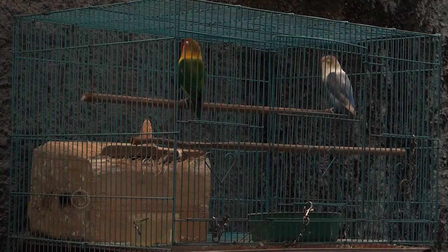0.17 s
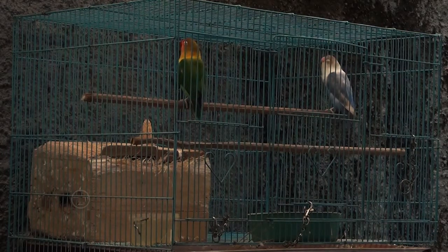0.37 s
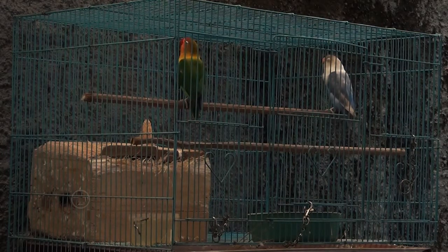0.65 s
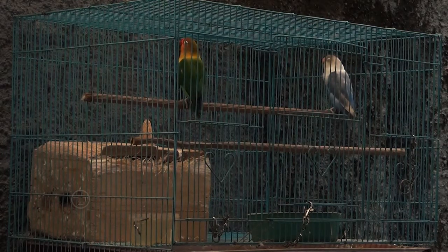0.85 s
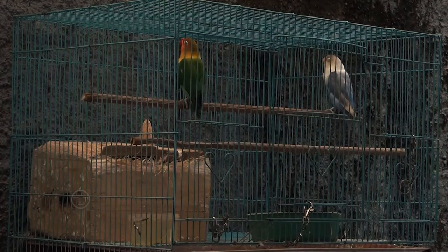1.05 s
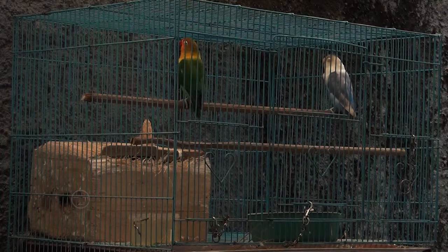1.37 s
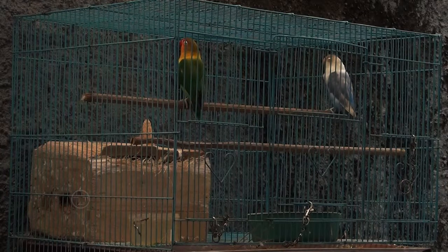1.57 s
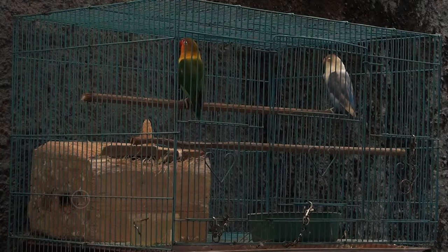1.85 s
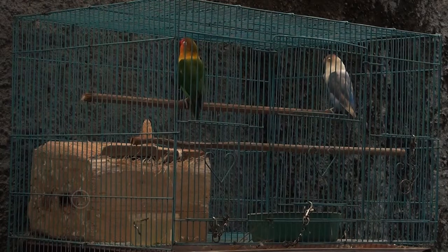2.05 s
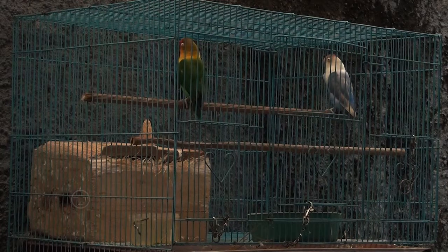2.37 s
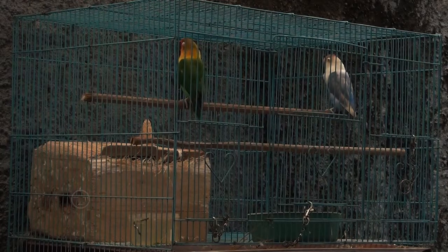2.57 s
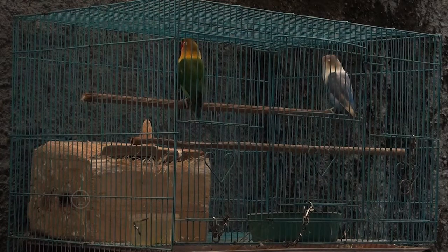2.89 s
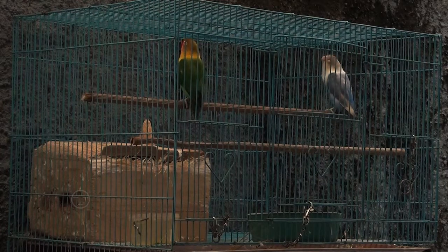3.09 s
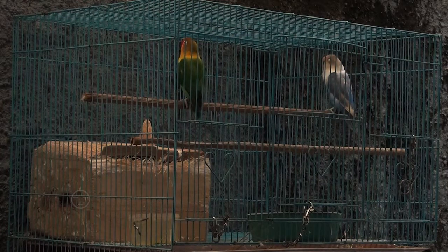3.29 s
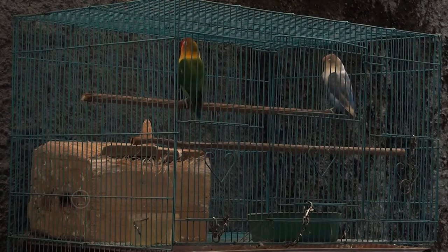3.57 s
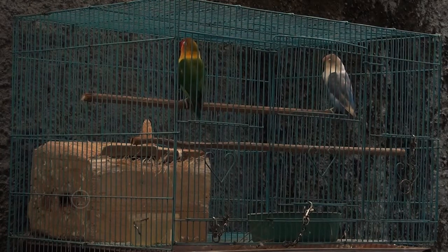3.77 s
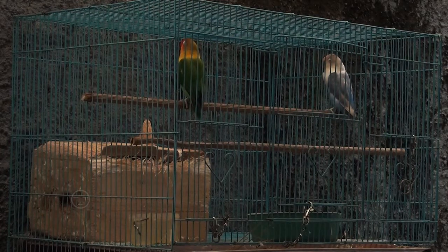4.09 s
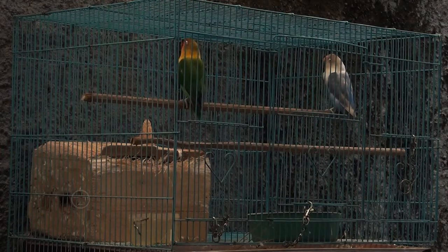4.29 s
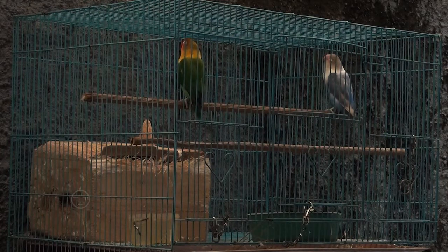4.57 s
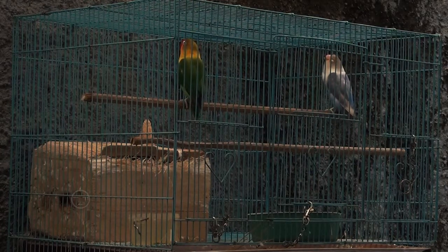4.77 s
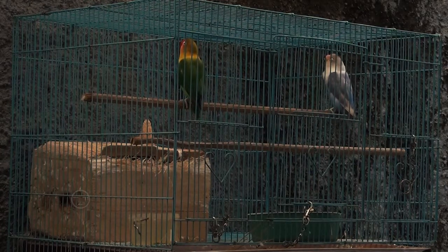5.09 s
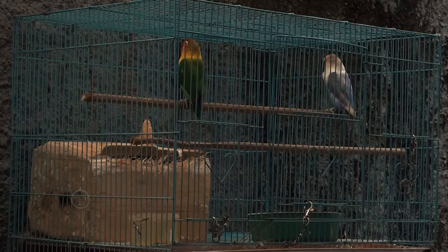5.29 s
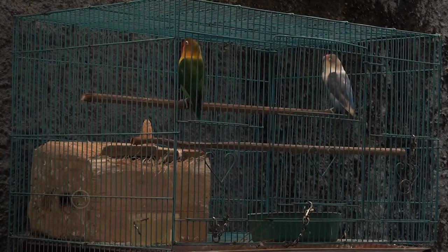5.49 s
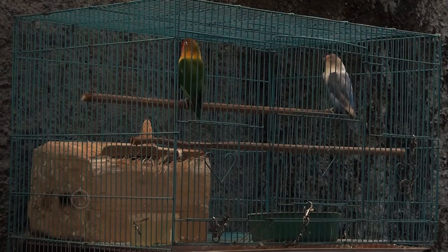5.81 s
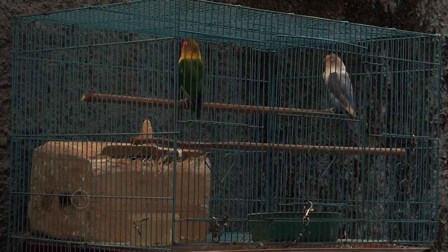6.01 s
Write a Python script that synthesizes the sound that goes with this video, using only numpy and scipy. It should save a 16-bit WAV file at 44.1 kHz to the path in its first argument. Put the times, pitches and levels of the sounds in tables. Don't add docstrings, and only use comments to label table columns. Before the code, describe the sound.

A small caged parrot fires off shrill, quick, gliding chirps in echoing bursts while traffic hisses and an engine drones faintly outside.

```python
import sys
import numpy as np
from scipy import signal
from scipy.fft import rfft, irfft
from scipy.io import wavfile
from scipy.ndimage import uniform_filter1d

SR = 44100
rng = np.random.default_rng(int(sys.argv[2]) if len(sys.argv) > 2 else 0)


def pcm_store(signal):
    levels = np.round(np.clip(np.atleast_2d(signal), -1, 1) * 32767)
    wavfile.write(sys.argv[1], SR, levels.astype(np.int16).T)


def decibels_to_gain(level_db):
    exponent = np.asarray(level_db, float) / 20
    return 10 ** exponent


N = 270774
LEAD = 11025


def rms_one(x):
    return x / np.sqrt(np.mean(x ** 2) + 1e-20)


def in_time(rows):
    s, value = np.transpose(rows)
    return np.interp(np.arange(N) / SR, s, value)


def at_hz(points, hz):
    points_hz, level_db = np.transpose(points)
    return np.interp(np.log(np.maximum(hz, 1)), np.log(points_hz), level_db)


def drift(rate, size, at=slice(None)):
    steps = rng.standard_normal(int(size / SR * 2000) + 3)
    return np.interp(np.arange(size)[at] * min(rate, 2000) / SR, np.arange(len(steps)), steps)


def band_pass(order, low_hz, high_hz, x):
    return signal.sosfilt(signal.butter(order, [low_hz, high_hz], "band", fs=SR, output="sos"), x)


def add(track, s, sound):
    at = round(s * SR) + LEAD
    track[at:at + len(sound)] += sound[:len(track) - at]


# [f/Hz, side minus mid level/dB]
WIDTH = [(60, -46), (150, -47), (380, -19.5), (950, -12), (2380, -9), (5980, -12.5), (15000, -22)]


def coloured(spectrum):
    hz = np.arange(N // 2 + 1) * SR / N
    mid, side = rfft(rng.standard_normal((2, N)))
    gain = decibels_to_gain(at_hz(spectrum, hz)) * (hz > spectrum[0][0]) * (hz < spectrum[-1][0])
    side = side * decibels_to_gain(at_hz(WIDTH, hz))
    return rms_one(irfft(gain * np.array([mid + side, mid - side]), N))


# [t/s, level/dB]
TRAFFIC = [(0, -50.5), (.75, -48.5), (1.52, -43.5), (2.05, -49.5), (2.77, -47), (3.2, -52.5), (3.6, -49),
           (4.55, -45.5), (4.86, -52.5), (5.3, -47), (6.14, -43)]
# [f/Hz, level/dB per Hz]
STREET = [(18, -35), (30, -56), (58, 2.5), (91, -24.5), (140, -4), (215, -2.5), (266, -9), (391, -4),
          (445, -9.5), (563, -8), (627, -8.5), (1750, -13.5), (5000, -28.5), (6500, -72), (11000, -120)]


def street():
    level_db = in_time(TRAFFIC) + 6 + 0.5 * drift(10.0, N)
    return decibels_to_gain(level_db) * coloured(STREET)


# [t/s, turning rate f/Hz]
SPEED = [(0, 30.8), (1.5, 28.7), (3, 30.8), (4.2, 30.2), (6.14, 31.4)]
# [t/s, level/dB]
DRONE = [(0, -49), (.5, -49), (1.2, -47), (2.7, -45.5), (3.1, -53), (3.6, -49.5), (4.55, -51.5),
         (4.8, -54.5), (6.14, -54)]
# [multiple of the turning rate, level/dB]
ORDERS_DB = [(1, -20), (2, -20), (3, -14), (4, -14), (5, -2.5), (6, -2.5), (7, -4.5), (8, -4.5), (9, -27),
             (10, -2), (11, -4.5), (12, -4.5), (13, 1), (14, -5), (15, -11), (16, -31), (17, -7.5),
             (18, -10), (19, -6.5), (20, -13)]
# [t/s, half width/s, multiple, level/dB]
SWELLS = [
    (2.43, 0.34, 5, 6),
    (3.9, 0.55, 5, 6),
    (2.2, .25, 6, 4),
    (3.65, 0.34, 6, 9.5),
    (5.87, 0.78, 6, 16),
    (1.96, 0.24, 7, 11.5),
    (2.883, 0.12, 7, 17.5),
    (4.5, 0.15, 7, 15.5),
]
# [t/s, length/s, f/Hz, level/dB]
WHINES = [
    (1.302, 0.32, 826, -42),
    (1.445, 0.21, 577, -43),
    (5.708, 0.19, 1095, -43.5),
]


def engine():
    turns = np.cumsum(in_time(SPEED) * (1 + 0.00281 * drift(3.48, N))) / SR
    t, out, drone_db = np.arange(N) / SR, 0, in_time(DRONE)
    for multiple, line_db in ORDERS_DB:
        level_db = drone_db + line_db + 3.6 * drift(9, N)
        for s, half_width, boom_multiple, boom_db in SWELLS:
            if boom_multiple == multiple:
                level_db = level_db + boom_db * np.exp(-((t - s) / half_width) ** 2)
        out = out + decibels_to_gain(level_db) * np.sin(2 * np.pi * (multiple * turns + rng.random()))
    for s, length, hz, level_db in WHINES:
        swell = np.sin(np.pi * np.clip((t - s) / length, 0, 1))
        out = out + decibels_to_gain(level_db) * swell * np.sin(2 * np.pi * hz * t)
    return out


# [f/Hz, decay time/s]
WALLS = [(1500, 0.61), (3000, 0.58), (6000, 0.55), (10000, 0.45), (15000, 0.52)]
# [delay t/s, level change/dB]
TAIL_DIPS = [
    (0.013, -2.5),
    (0.023, -7),
    (0.049, -1.5),
    (0.067, -4),
    (.093, -1.5),
    (.12, 0),
]
# [delay t/s, sign, level/dB]
NEAR = [
    (.00161, -1, -31.5),
    (.00313, 1, -14.5),
    (.00415, 1, -26),
    (.00862, -1, -25),
    (0.015, -1, -15),
    (0.0238, -1, -16),
]
# [f/Hz, side minus mid level/dB]
SPREAD = [(1500, -12.5), (4000, -9.5), (8000, -13), (13000, -15)]


def walls(x, wet_db, side_db, gap_s):
    t, tail = np.arange(SR) / SR, 0
    echoes = rng.standard_normal((2, SR)) * (rng.random((2, SR)) < .03 + t / .06)
    echoes = echoes / np.sqrt(np.minimum(0.0068 + t / 0.056, 1)) * np.clip(t / gap_s - 1, 0, 1)
    dip_db = sum(db * np.exp(-((t - s) / 0.0065) ** 2) for s, db in TAIL_DIPS)
    early_db = 1.5 / (1 + (t / 0.099) ** 8)
    echoes = echoes * decibels_to_gain(dip_db + early_db)
    edges = np.geomspace(900, 18000, 10)
    for low, high in zip(edges, edges[1:]):
        decay_s = at_hz(WALLS, np.sqrt(low * high))
        tail = tail + band_pass(2, low, high, echoes) * decibels_to_gain(-60 * t / decay_s)
    mid, side = decibels_to_gain(wet_db - 28.0) * tail
    for s, sign, level_db in NEAR:
        mid[round(s * SR)] += sign * decibels_to_gain(level_db)
    side = irfft(rfft(side) * decibels_to_gain(side_db + at_hz(SPREAD, np.arange(SR // 2 + 1))))
    wet = signal.fftconvolve(x[None], np.array([mid + side, mid - side]), axes=1)
    return (x + wet[:, :len(x)])[:, LEAD:]


# [t/s, peak level/dB]
TICKS = [
    (1.869, -46),
    (2.51, -38),
    (3.716, -38),
    (3.87, -50),
    (4.208, -45),
]
# [t/s, length/s, level/dB]
RUSTLES = [(.692, 0.0094, -23), (2.099, .028, -20), (2.947, .004, -29), (2.954, 0.011, -18),
           (4.642, 0.0095, -21), (4.652, 0.0092, -25), (.254, .006, -28), (2.72, 0.016, -23),
           (3.2, .0041, -34), (4.226, 0.011, -27.5), (3.001, .004, -26), (4.688, .003, -23),
           (3.217, 0.0044, -21), (4.7, .0033, -26), (5.428, 0.0028, -27), (6.8, .0025, -23),
           (5.444, .003, -16), (6.6, .012, -30), (4.86, 0.038, -23), (3.16, 0.039, -22), (0.28, .07, -25)]
# [t/s, length/s, level/dB]
SHAKES = [
    (4.376, .018, -34),
    (4.448, 0.031, -33),
]
# [t/s, length/s, level/dB]
RASPS = [
    (4.2255, .01, -14),
    (4.241, .008, -19),
    (5.436, .016, -33),
]


def cage():
    track, t = np.zeros(N + LEAD), np.arange(400) / SR
    for s, peak_db in TICKS:
        crack = band_pass(2, 6500, 14000, rng.standard_normal(len(t))) * np.exp(-t / 0.0013)
        add(track, s, decibels_to_gain(peak_db) * crack)
    for puffs, low_hz, high_hz in ((RUSTLES, 1900, 12800), (SHAKES, 1900, 16000), (RASPS, 2300, 3700)):
        for s, length, level_db in puffs:
            puff = band_pass(4, low_hz, high_hz, rng.standard_normal(3000))[:int(length * SR)]
            add(track, s, decibels_to_gain(level_db) * puff * np.hanning(len(puff)))
    return track


# [f/Hz, level/dB]
THROAT = [(1400, 3), (2500, 9), (4000, 7.5), (6000, 2), (8000, 0.5), (10000, -7), (12000, -6),
          (13300, -9.5), (14300, -16), (16000, -29)]


def voice(notes, jitter, flutter_db, fall_db, rasp_db, fray, tie_s=.001):
    s, length, start_hz, end_hz, level_db, second_db = np.transpose(sorted(notes))
    t = (np.arange(N + LEAD) - LEAD) / SR
    length, slur_s = np.maximum(length, .002), .0008 + tie_s

    def along(first, last, a, b):
        knots = np.maximum.accumulate(np.ravel([s + first * length, s + last * length], "F"))
        return uniform_filter1d(np.interp(t, knots, np.ravel([a, b], "F")), round(slur_s * SR))

    blowing = np.searchsorted(s, t) > np.searchsorted(np.sort(s + length + tie_s), t)
    gate = uniform_filter1d(uniform_filter1d(blowing * 1., 40), 40)
    on = gate > 1e-4
    hz = (along(0, 0.92, start_hz, end_hz) * (1 + jitter * drift(900, len(t))))[on]
    order = np.arange(1, 8)[:, None]
    overtone_db = along(0.033, 0.84, second_db, second_db)[on] - fall_db * (order - 2)
    stack_db = (order > 1) * overtone_db + at_hz(THROAT, order * hz)
    leap = np.abs(np.gradient(uniform_filter1d(np.log(hz), 60))) * SR
    stack_db = stack_db - 0.03 * order * np.minimum(leap, 150)
    frayed = np.clip(fray * (order - 1.7), 0, 1)
    torn = np.array([drift(1500, len(t), on) for _ in order])
    grain = np.sqrt(1 - frayed) + np.sqrt(frayed) * 0.79 * torn
    waves = np.sin(2 * np.pi * order * np.cumsum(hz) / SR)
    tones = grain * decibels_to_gain(stack_db) * (order * hz < .45 * SR) * waves
    air = band_pass(4, 2300, 12000, rng.standard_normal(len(t))[on])
    effort = decibels_to_gain(along(0.13, 0.72, level_db, level_db) + flutter_db * drift(350, len(t))) * gate
    track = np.zeros(len(t))
    track[on] = effort[on] * (tones.sum(axis=0) + decibels_to_gain(rasp_db) * air)
    return track


def overtone(notes, second_db):
    return [(*note, second_db) for note in notes]


# [t/s, length/s, f/Hz, level/dB]
HOLLOW = [
    (4.325, .014, 1500, -32.5),
]


def hollow_note(multiple, change_db):
    return [(s, n, multiple * hz, multiple * hz, db + change_db, -40) for s, n, hz, db in HOLLOW]


# [t/s, length/s, start f/Hz, end f/Hz, level/dB]
PURE = [
    (1.862, .03, 7550, 7400, -59),
    (2.719, 0.014, 2328, 2374, -31.5),
    (5.546, 0.0122, 3291, 3660, -33.5),
    (5.558, 0.0118, 3895, 4323, -21),
    (5.57, 0.012, 4270, 4206, -19),
    (5.582, 0.0116, 4210, 4117, -13),
    (5.594, 0.022, 3896, 3847, -14.5),
]


def second_bird():
    return voice(overtone(PURE, -1) + hollow_note(1, 0),
                 jitter=0.00074, flutter_db=0.0, fall_db=8, rasp_db=-46, fray=0.014, tie_s=0.0022)


# [t/s, length/s, start f/Hz, end f/Hz, level/dB]
CHIRP = [
    (5.936, 0.0047, 3560, 3565, -28),
    (5.956, 0.012, 2520, 3050, -30),
    (5.968, 0.034, 2956, 2887, -36.5),
    (5.992, 0.012, 2800, 2940, -26.5),
    (6.008, 0.022, 2830, 2470, -28),
    (6.03, 0.013, 2376, 2300, -22.5),
]


def last_chirp():
    return voice(overtone(CHIRP, -5.5), jitter=0.0029, flutter_db=1.5, fall_db=1.5, rasp_db=-31.5, fray=0.088)


# [t/s, length/s, start f/Hz, end f/Hz, level/dB]
HARSH = [(-.2, 0.041, 1898, 2483, -17.5), (-.15, 0.036, 2445, 3200, -25), (-.11, 0.034, 3210, 4210, -27.5),
         (.254, 0.0063, 3230, 4677, -20), (.3, 0.0099, 4825, 4500, -13.5), (.692, 0.008, 3170, 3070, -15),
         (.75, .02, 4930, 4573, -13), (2.104, 0.004, 2598, 3270, -10), (2.142, .01, 2810, 2988, -34),
         (2.154, 0.012, 3777, 4300, -23), (2.111, .009, 5680, 5160, -16), (2.121, .022, 4500, 4377, -19),
         (2.955, 0.007, 3111, 2409, -21), (3.252, 0.03, 4600, 4300, -17.5), (3.285, 0.051, 3727, 4090, -28),
         (3.392, 0.013, 1512, 2100, -28.5), (4.2255, .004, 3703, 2600, -23.5),
         (4.23, .004, 2694, 3685, -20), (4.928, .025, 4500, 4200, -17), (4.242, 0.004, 3327, 2490, -27),
         (4.635, 0.004, 3300, 2893, -17.5), (4.905, .006, 4378, 4487, -16), (4.914, .01, 4607, 4300, -15.5),
         (.262, .006, 4824, 4875, -23), (5.147, 0.007, 4010, 4374, -15), (5.163, 0.02, 2694, 2550, -31),
         (5.949, .006, 2547, 2450, -28.5)]
# [t/s, length/s, start f/Hz, end f/Hz, level/dB]
CROAKS = [(.202, 0.0068, 2748, 2418, -21.5), (.309, 0.012, 2300, 1496, -29),
          (.322, 0.051, 1618, 2300, -31.5), (2.948, 0.0019, 2590, 2503, -21),
          (3.0, 0.0072, 3003, 3371, -30), (3.149, 0.0083, 2597, 1800, -24.5),
          (3.16, 0.033, 1961, 2402, -24), (3.223, 0.02985, 2679, 2808, -32.5),
          (4.642, 0.0086, 2444, 2604, -20.5), (4.865, 0.025, 2736, 2570, -23.5),
          (5.138, 0.011, 2562, 2685, -23.5)]


def harsh_notes():
    first_s, gap_s, length_s, hz, level_db = 5.428, .008, .003, 1880, -28.5
    cluck = [(first_s + k * gap_s, length_s, 0.95 * hz, 1.2 * hz, level_db) for k in range(3)]
    return voice(overtone(HARSH, 0) + overtone(cluck, 0) + overtone(CROAKS, 9),
                 jitter=0.05, flutter_db=4, fall_db=4.5, rasp_db=-11.0, fray=.45)


# [t/s, length/s, f/Hz, level/dB]
TOP = [(0.261, .014, 4880, -12), (3.257, .024, 5660, -13.5), (0.414, .016, 5850, -16.5),
       (0.81, .013, 5990, -15.5), (2.72, 0.01188, 5970, -14.5), (2.732, .016, 6110, -11),
       (2.767, .014, 6140, -15.5), (3.015, .0084, 5690, -11.5), (3.086, .03, 6110, -13.5),
       (4.693, .011, 4843, -10.5), (4.702, .012, 6050, -9), (4.765, .0071, 4706, -11),
       (4.773, .02, 6157, -12), (4.828, .012, 6147, -16), (2.754, .008, 6100, -17),
       (3.128, .018, 6203, -15.5), (4.92, .0088, 5400, -15)]


def top_notes():
    rise_per_s = 1.47
    top = []
    for s, length, hz, level_db in TOP:
        half_rise = rise_per_s * length / 2
        top.append((s, length, hz * (1 - half_rise), hz * (1 + half_rise), level_db))
    return voice(overtone(top, -3) + hollow_note(3, -7),
                 jitter=0.0095, flutter_db=3.5, fall_db=6, rasp_db=-17, fray=0.21, tie_s=0)


# [t/s, length/s, start f/Hz, end f/Hz, level/dB]
LOW = [
    (.209, .011, 2362, 2206, -27),
    (.246, .011, 2416, 2556, -29.5),
    (2.963, 0.047, 2365, 2233, -26),
    (4.652, .008, 3007, 3021, -25),
    (4.672, 0.014, 2373, 2330, -26.5),
    (4.889, 0.014, 2320, 2272, -26),
]
# [t/s, length/s, start f/Hz, end f/Hz, level/dB]
SLIDES = [(2.1755, 0.0033, 3848, 3847, -19.5), (4.957, .012, 3883, 3825, -27),
          (4.971, 0.013, 3898, 3848, -19), (.221, 0.0093, 2560, 2630, -24),
          (.229, 0.014, 2827, 3010, -20.5), (.683, 0.0046, 2322, 2245, -25),
          (2.074, 0.011, 1637, 1696, -34.5), (3.213, .01, 2593, 2634, -20.5),
          (4.66, 0.01177, 2670, 2420, -25), (4.843, 0.0076, 1646, 1764, -31),
          (4.853, 0.008, 1884, 2877, -19), (5.088, .01, 1968, 2705, -29)]
# [t/s, length/s, start f/Hz, end f/Hz, level/dB]
FALLING = [(2.11, .006, 3203, 3024, -15), (3.417, 0.0071, 2465, 2166, -19),
           (3.439, 0.011, 5354, 5320, -18.5), (.272, .016, 5045, 3625, -15),
           (.288, 0.017, 3480, 3345, -19.5), (.386, 0.0067, 5250, 5080, -11.5),
           (.393, 0.01, 3747, 3640, -9), (.44, 0.0024, 3750, 3530, -12), (.768, .018, 5000, 4313, -19),
           (.788, 0.016, 3552, 3552, -12), (2.118, 0.018, 2243, 2170, -21),
           (3.028, 0.0098, 5765, 5097, -19), (3.041, 0.021, 3516, 3355, -11),
           (3.196, 0.0079, 3637, 3506, -9), (3.204, 0.0086, 3448, 3145, -11),
           (4.712, 0.014, 4775, 4480, -10.5), (4.727, 0.0086, 4060, 3308, -14.5),
           (4.859, 0.015, 3650, 3320, -14), (4.997, 0.013, 6230, 5730, -13),
           (5.126, .011, 3475, 3263, -10.5)]
# [t/s, length/s, start f/Hz, end f/Hz, level/dB]
RISING = [(.375, 0.012, 2380, 3270, -20), (.404, 0.006, 3660, 4260, -12.5),
          (.703, 0.0087, 3160, 3513, -15.5), (.713, 0.0065, 3506, 3864, -10.5),
          (.722, 0.009, 4130, 4270, -10.5), (.732, 0.012, 4474, 5150, -11.5),
          (.827, 0.013, 4225, 4376, -10.5), (.839, 0.015, 4360, 4430, -15),
          (2.084, 0.0063, 1842, 2057, -20.5), (2.091, .011, 2110, 2209, -17.5),
          (2.166, 0.0078, 2952, 3302, -15.5), (2.18, 0.0048, 2403, 3280, -9.5),
          (2.186, .013, 4190, 4240, -14.5), (2.202, 0.0052, 4090, 4400, -12.5),
          (3.061, .012, 3526, 3750, -15.5), (3.074, .003, 3810, 3885, -12), (3.079, 0.0026, 4050, 4200, -8),
          (3.225, 0.012, 3794, 3855, -14.5), (3.237, 0.018, 3823, 3969, -19.5),
          (3.426, 0.0049, 3107, 3686, -15.5), (3.432, .006, 4200, 5170, -21.5),
          (4.737, 0.032, 3854, 4252, -17), (4.991, 0.0038, 3896, 4310, -10.5),
          (5.076, 0.011, 1667, 1753, -26.5), (5.108, 0.008, 2683, 2744, -27),
          (5.121, 0.0049, 3120, 3500, -15)]


def clear_notes():
    notes = overtone(LOW, 16) + overtone(SLIDES, 7) + overtone(FALLING, -12.5) + overtone(RISING, -4)
    return voice(notes, jitter=0.0087, flutter_db=3.0, fall_db=2.0, rasp_db=-17.5, fray=0.13, tie_s=0)


def birds():
    return clear_notes() + top_notes() + harsh_notes() + last_chirp() + second_bird()


def scene():
    calls = birds()
    traffic = street()
    room = walls(calls + cage(), wet_db=4.5, side_db=-1.5, gap_s=0.00036)
    return room + engine() + traffic


def gain_control(x):
    level_db = 10 * np.log10(uniform_filter1d(np.mean(x ** 2, axis=0), 900) + 1e-12)
    ramp_db = 12 * np.arange(N) / SR
    held_db = np.maximum.accumulate(level_db + ramp_db) - ramp_db
    slow = np.exp(-1 / (0.0043 * SR))
    duck_db = signal.lfilter([1 - slow], [1, -slow], 0.33 * np.maximum(held_db + 19.0, 0))
    return x * decibels_to_gain(-duck_db)


# [f/Hz, level/dB per Hz]
HISS = [(3200, -8), (4500, 0), (6300, -2), (8000, -4), (10000, -6), (13000, -8), (14500, -9), (14900, -3),
        (15300, -10), (15900, -12)]


def circuit_hiss():
    return decibels_to_gain(-58.5) * coloured(HISS)


# [t/s, length/s, lowest lost f/Hz]
TREBLE_LOST = [(.29, .125, 15250), (.415, .1, 12800), (.515, .09, 12500), (.76, .07, 15150), (.83, .13, 13650),
               (2.1, .1, 15300), (2.2, .09, 13700), (2.73, .03, 14000), (2.76, .13, 13100), (2.97, .11, 14300),
               (3.08, .04, 13700), (3.12, .175, 14850), (3.295, .075, 12700), (3.37, .045, 14500),
               (3.45, .1, 15150), (4.66, .115, 15550), (4.775, .225, 14500), (5.0, .065, 13200),
               (5.065, .07, 14300), (5.96, .13, 15350)]


def treble_gaps(x):
    hz, t, cells = signal.stft(x, SR, nperseg=512)
    for s, length, low_hz in TREBLE_LOST:
        cells = cells * (1 - (hz[:, None] > low_hz) * (t > s) * (t < s + length))
    return signal.istft(cells, SR, nperseg=512)[1][:, :N]


# [f/Hz, level/dB]
MIC = [(20, -4), (45, -2.5), (100, 0.5), (15600, -0.5), (16200, -20), (16450, -55)]


def microphone(x):
    return irfft(rfft(x) * decibels_to_gain(at_hz(MIC, np.arange(N // 2 + 1) * SR / N)), N)


def band_limit(x):
    return signal.sosfilt(signal.butter(12, 16420, fs=SR, output="sos"), x)


def record(dry):
    x = gain_control(dry) + circuit_hiss()
    x = .9 * x / (.9 ** 8 + x ** 8) ** (1 / 8)
    mix = microphone(treble_gaps(x))
    return band_limit(mix)


dry = scene()
out = record(dry)
pcm_store(out)
```